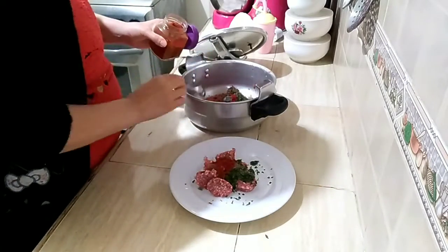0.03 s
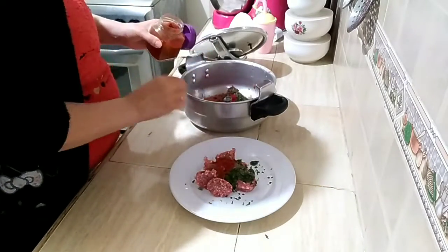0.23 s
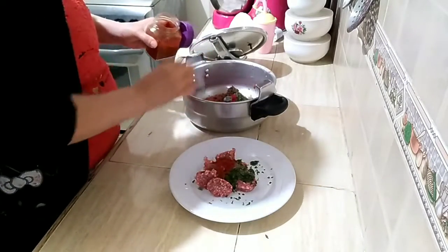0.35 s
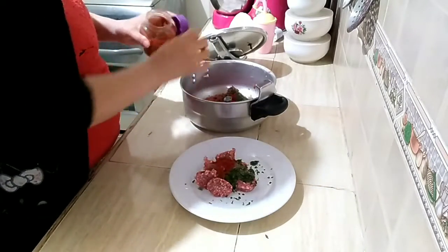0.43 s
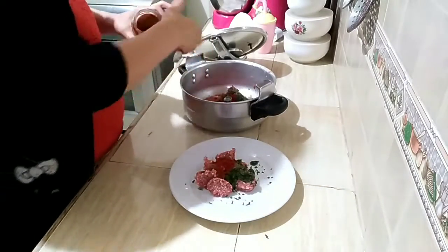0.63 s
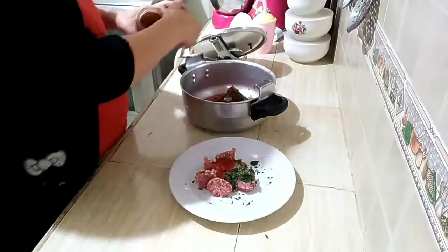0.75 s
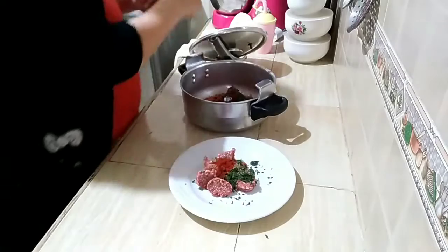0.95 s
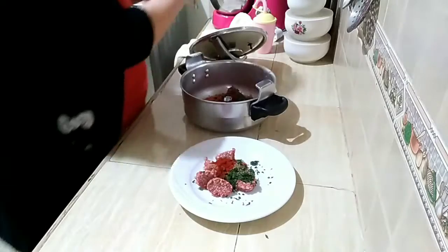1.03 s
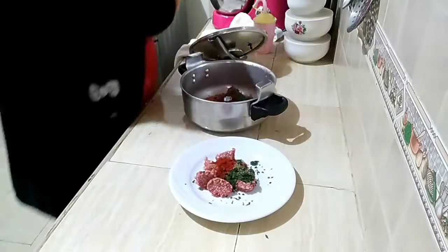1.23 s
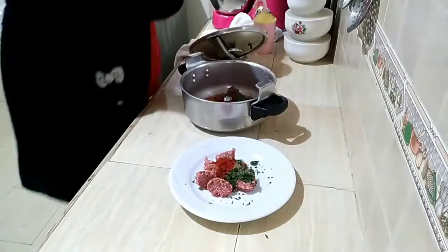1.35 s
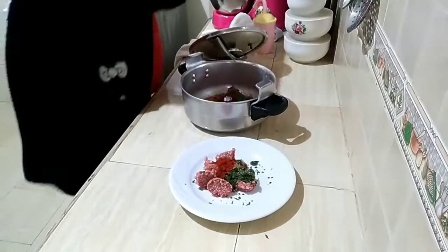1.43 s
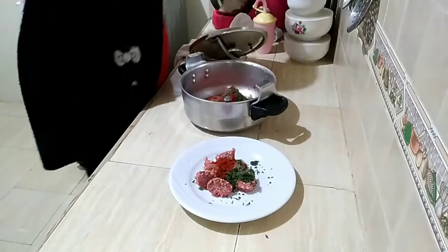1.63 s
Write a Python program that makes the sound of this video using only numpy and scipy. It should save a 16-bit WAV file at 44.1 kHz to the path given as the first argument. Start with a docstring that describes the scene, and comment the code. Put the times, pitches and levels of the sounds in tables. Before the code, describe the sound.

Two bright glass clinks, soft bumps, then a jar scraping and knocking down on a hard counter

```python
"""Tiled kitchen, close to the counter, two microphones: two sharp glass clinks amid soft bumps, then faint ticks.
A jar slides with a falling hollow note and clatters to rest; light glass touches follow, over a quiet low rumble.
Contacts are filtered noise dying away in the room; glass, jar and counter ring as wavering sine modes.
The slide is random friction grains through resonances. A suppressor thins faint sound; loud peaks clip softly."""
import sys
import numpy as np
from scipy import signal
from scipy.fft import irfft
from scipy.io import wavfile
from scipy.ndimage import uniform_filter1d

SR = 44100
rng = np.random.default_rng(int(sys.argv[2]) if len(sys.argv) > 2 else 0)


def store_wav(level_fs):
    """Save 16-bit WAV to argv[1]."""
    pcm = np.round(np.clip(np.atleast_2d(level_fs), -1, 1) * 32767)
    wavfile.write(sys.argv[1], SR, pcm.T.astype(np.int16))


N = 74970  # samples, 1.7 s

# Likeness of diffuse sound at the two microphones: (frequency [Hz], correlation [-1 to 1])
LIKENESS = [(30, .4), (120, .9), (300, .7), (600, .35), (1100, -0.11), (2000, -0.072), (16000, 0.034)]
# Colour of glassy clack and grit: (frequency [Hz], relative level [dB])
CLACK_COLOUR = [(200, -37), (1000, -18), (1850, -9.5), (2600, 0.5), (3400, -5.5), (4500, -5.5),
                (5150, -0.5), (5550, -2), (6700, 0.5), (7300, -4.5), (8400, -6), (9500, -8.5),
                (11500, -14.5), (15500, -22)]


def amp(db):
    """Decibels to gain."""
    return 10 ** (np.asarray(db) / 20)


def evened(x):
    """Scales to rms 1."""
    return x / np.sqrt(np.mean(x ** 2) + 1e-20)


def read(points, hz):
    """Reads a table on a log-frequency axis."""
    f, value = np.transpose(points)
    return np.interp(np.log(hz + 1), np.log(f + 1), value)


def add(mix, s, sound):
    """Mixes a sound in at time s, cut off at the end of the mix."""
    part = mix[:, max(round(s * SR), 0):][:, :sound.shape[-1]]
    part += sound[..., :part.shape[1]]


def coloured(x, points, unit=True, size=4096):
    """Causal minimum-phase filter with the given spectrum, of unit energy unless told otherwise."""
    hz = abs(np.fft.fftfreq(size, 1 / SR))
    log_gain = np.log(amp(read(points, hz)))
    spectrum = np.exp(np.conj(signal.hilbert(log_gain)))
    taps = np.fft.ifft(spectrum).real[:size // 2]
    if unit:
        taps = taps / np.linalg.norm(taps)
    return signal.oaconvolve(x, taps[None], axes=1)[:, :x.shape[1]]


def resonate(x, hz, width_hz):
    """A resonance that follows hz: shift it to zero, low-pass with two equal poles, shift back."""
    turn = np.exp(2j * np.pi * np.cumsum(hz * np.ones(N)) / SR)
    r = np.exp(-np.pi * width_hz / SR)
    lowered = x / turn + 1e-18
    return (turn * signal.lfilter([(1 - r) ** 2], [1, -2 * r, r * r], lowered)).real


def diffuse(size=65536):
    """Sound from all sides: flat spectrum, random phase, most alike at both microphones in the bass."""
    hz = np.fft.rfftfreq(size, 1 / SR)
    a, b = np.exp(2j * np.pi * rng.random((2, len(hz))))
    same = np.clip(read(LIKENESS, hz), -1, 1)
    return evened(irfft([a, same * a + np.sqrt(1 - same ** 2) * b]))


def room(early_db, size=256):
    """One contact as heard: a dense cluster off counter and tiles, then the kitchen's tail."""
    # Decay of the kitchen: (frequency [Hz], t60 [s])
    decay = [(60, 0.68), (200, 0.84), (500, 0.48), (1200, 0.5243), (2700, 0.5281), (6500, 0.4668),
             (10000, 0.4922), (15000, 0.55)]
    early_s = .012  # the cluster's extra level falls away around here
    hz, t, z = signal.stft(diffuse()[:, :SR], SR, nperseg=size)
    dying = z * amp(-60 * t / read(decay, hz)[:, None])
    tail = signal.istft(dying, SR, nperseg=size)[1][:, :SR]
    return tail * (1 + amp(early_db) / (1 + (np.arange(SR) / SR / early_s) ** 6))


def ring(modes, waver, waver_s, size=1000):
    """Dying modes; reflections make each waver differently at the two microphones."""
    t = np.arange(SR) / SR
    out = np.zeros((2, SR))
    for hz, db, t60 in modes:
        # Only the second microphone departs from the first, most where likeness is low
        unlike = (1 - np.clip(read(LIKENESS, hz), 0, 1)) * np.array([[0], [1]])
        knots = rng.standard_normal((2, size)) + 1j * rng.standard_normal((2, size))
        knots = knots[0] + np.sqrt(unlike) * (knots - knots[0])
        phase = np.exp(1j * np.pi * rng.uniform(-0.8, 1) * unlike)
        knots = phase + waver * knots
        drift = np.array([np.interp(t / waver_s, np.arange(size), k) for k in knots])
        out += amp(db - 60 * t / t60) * (drift * np.exp(2j * np.pi * hz * t)).imag
    return out


def rumble():
    """Quiet low rumble of the room: diffuse noise weighted to the bass."""
    # Colour of the rumble: (frequency [Hz], relative level [dB])
    rumble_colour = [(25, -17), (110, 1), (200, -18.5), (450, -12), (800, -27.5), (3000, -23.5),
                     (7000, -33.5), (15000, -49)]
    level_db = -68
    return amp(level_db) * evened(coloured(diffuse(size=2 * N)[:, :N], rumble_colour))


def handling():
    """Faint ticks and light touches as short noise in the room, and soft bumps as a decaying low mode."""
    # Faint ticks: (time [s], level [dB])
    ticks = [(0.8150, -63), (0.8560, -59.5)]
    # Light touches of glass on glass: (time [s], level [dB], ping level [dB])
    touches = [(1.533, -53, -76), (1.5600, -57, -76), (1.5862, -49.5, -49), (1.6820, -63.5, -66.5)]
    # Soft bumps of movement: (time [s], level [dB])
    bumps = [(0.008, -54), (0.040, -46.5), (0.093, -56.5), (0.555, -44), (0.605, -41.5), (0.664, -43.5),
             (0.779, -47), (0.811, -47), (0.858, -48)]
    # Colours of tick and touch: (frequency [Hz], relative level [dB])
    tick_colour = [(200, -15), (800, -25), (3000, -21), (4000, -14), (5600, -23.5), (6000, -6),
                   (6650, -10.5), (7400, -21), (7850, -3.5), (8300, -14.5), (9500, -18.5), (15500, -19.5)]
    touch_colour = [(100, -22), (420, 3), (800, -12), (1350, 1.5), (1900, -9.5), (2600, 0), (3200, -6),
                    (3620, 2), (4100, -2), (5500, 2.5), (6400, 5), (8200, -0.5), (10000, -6), (15500, -11)]
    # Ping of a lightly touched glass: (frequency [Hz], relative level [dB], t60 [s])
    ping_modes = [(3620, -1, .08), (6500, -3, .15)]
    bump_hz, bump_t60_s, bump_rise_s = 114, 0.13, 0.002
    out = np.zeros((2, N))
    for s, db in ticks:
        add(out, s, amp(db) * coloured(room(early_db=8), tick_colour))
    for s, db, ping_db in touches:
        add(out, s, amp(db) * coloured(room(early_db=-10.5), touch_colour))
        add(out, s, amp(ping_db) * ring(ping_modes, waver=0.089, waver_s=0.023))
    rise = 1 - np.exp(-np.arange(SR) / SR / bump_rise_s)
    for s, db in bumps:
        add(out, s, amp(db) * rise * ring([(bump_hz, 0, bump_t60_s)], waver=0.16, waver_s=.015))
    return out


def slide():
    """Friction grains excite a falling hollow note, a glassy grit and a brief squeak."""
    # Course of the slide: (time [s], level [dB], hollow resonance [Hz])
    course = [(0.984, -63.5, 569), (0.994, -42.5, 550), (1.014, -48.5, 528), (1.036, -38, 493),
              (1.052, -31.5, 459), (1.073, -37, 395), (1.088, -40.5, 290), (1.135, -46.5, 260)]
    # Squeak: (centre time [s], bell-curve spread [s], pitch [Hz], width [Hz], level [dB])
    at, spread, pitch_hz, squeak_width_hz, squeak_db = (1.060, .007, 5230, 200, -31)
    hollow_width_hz, grit_db, grains_per_s, room_db = 113, 1, 1200, -5
    t = np.arange(N) / SR
    s, db, hz = np.transpose(course)
    level = amp(np.interp(t, s, db, left=-150, right=-150))
    grains = rng.standard_normal((2, N)) * (rng.random((2, N)) < grains_per_s / SR)
    shared_grains = grains + .5 * grains[::-1]  # each microphone also gets some of the other's
    hollow = evened(resonate(shared_grains, np.interp(t, s, hz), hollow_width_hz))
    grit = amp(grit_db) * evened(coloured(grains, CLACK_COLOUR))
    scrape = level * (hollow + grit)
    squeak = amp(squeak_db) * evened(resonate(grains, pitch_hz, squeak_width_hz))
    squeak = squeak * np.exp(-.5 * ((t - at) / spread) ** 2)
    walls = room(early_db=-19)
    walls = walls / np.linalg.norm(walls[0])
    return scrape + squeak + amp(room_db) * signal.fftconvolve(scrape, walls, axes=1)[:, :N]


def knocks():
    """The jar rocks on its base and bumps its neighbours; the counter thumps beneath."""
    # Jar knocks: (time [s], glassy clack level [dB], hollow knock level [dB], counter thump level [dB])
    hits = [(0.9876, -40, -42, -76.5), (1.019, -39.5, -41.5, -49.5), (1.0471, -36, -36.5, -65.5),
            (1.0870, -40, -36.5, -26.5), (1.1080, -66, -40.5, -28.5), (1.1380, -31, -37, -20.5),
            (1.1447, -25.5, -34, -26.5), (1.1533, -19.5, -28, -35.5), (1.2067, -26.5, -30, -27.5),
            (1.2370, -35.5, -46.5, -27.5), (1.3961, -47.5, -53.5, -44)]
    # Colours of knock and thump: (frequency [Hz], relative level [dB])
    knock_colour = [(40, -37.5), (200, -26), (400, -5), (540, -5.5), (680, -2), (880, -8), (1090, -1.5),
                    (1190, -2), (1320, 0.5), (1750, -14.5), (3500, -15), (9000, -48)]
    thump_colour = [(30, -24), (60, -24), (90, -2.5), (150, -21.5), (230, 2.5), (300, -6), (385, -5.5),
                    (500, -13.5), (1000, -32), (4000, -61.5)]
    # Modes of the knocked jar and of the counter: (frequency [Hz], relative level [dB], t60 [s])
    jar_modes = [(1297, -9, .55), (2560, -8, .25), (2879, -5, .3), (3560, -6, .35), (5146, 0, .35),
                 (5922, -5, .3), (6122, -5, .35), (6625, -4, .3), (7974, -6, .3)]
    counter_modes = [(81.5, -41.5, 1), (122.2, -25.5, 1), (206.7, -8, 0.45), (227, 1.5, 0.097),
                     (382, -4, 0.064)]
    jar_db, boom_db, thump_rise_s = -9, -15.5, .002
    out = np.zeros((2, N))
    rise = 1 - np.exp(-np.arange(SR) / SR / thump_rise_s)
    for s, clack_db, knock_db, thump_db in hits:
        clack = coloured(room(early_db=0.5), CLACK_COLOUR)
        jar = amp(jar_db) * ring(jar_modes, waver=.5, waver_s=0.041)
        add(out, s, amp(clack_db) * (clack + jar))
        add(out, s, amp(knock_db) * coloured(room(early_db=-3), knock_colour))
        boom = amp(boom_db) * coloured(room(early_db=-2), thump_colour)
        counter = rise * ring(counter_modes, waver=0.11, waver_s=0.017)
        add(out, s, amp(thump_db) * (counter + boom))
    return out


def clinks():
    """Two hard taps: a bright crack of noise, hollow body modes and the ringing of the glass."""
    # Sharp clinks: (time [s], level [dB], ringing level [dB])
    taps = [(0.2145, -10, -16), (0.3626, -10, -17)]
    # Colour of the crack: (frequency [Hz], relative level [dB])
    crack_colour = [(30, -27.5), (150, -19), (330, -17.5), (540, -11.5), (700, -19), (1000, -12.5),
                    (1800, -19), (2700, -9.5), (3250, -14.5), (3850, -16), (4180, -8.5), (4700, -11),
                    (5050, 0.5), (5750, -12.5), (6300, -1), (6820, 2), (7250, -6.5), (8200, -5.5),
                    (9300, -15), (10600, -11), (11300, -21), (14500, -21.5), (16000, -31)]
    # Modes of the struck glass and its low body: (frequency [Hz], relative level [dB], t60 [s])
    glass_modes = [(2659, -15, .5), (2937, -14, .3), (4213, -13, .4), (4977, -8, .3), (5036, -8, .4),
                   (5137, -10, .45), (5479, -12, .38), (6280, 0, .42), (6310, -4, .45), (6532, -5, .38),
                   (6657, -7, .35), (6721, -5, .38), (6826, 2, .46), (7665, -8, .4), (8511, -11, .42)]
    body_modes = [(548, -12, .16), (907, -15, .42)]
    out = np.zeros((2, N))
    for s, db, ring_db in taps:
        add(out, s, amp(db) * coloured(room(early_db=-5), crack_colour))
        add(out, s, amp(ring_db) * ring(glass_modes, waver=0.57, waver_s=.025))
        add(out, s, amp(db) * ring(body_modes, waver=.3, waver_s=.015))
    return out


def suppress(x, size=512):
    """Noise suppressor: turns down whatever is faint, band by band."""
    below_db, depth_db = -76, 8  # power in a band where half the depth applies; greatest cut
    z = signal.stft(x, SR, nperseg=size)[2]
    power = uniform_filter1d(abs(z) ** 2, size=5, axis=1)  # smooth across bands
    power = uniform_filter1d(power, size=3, axis=2)  # then across time
    faint = 1 / (1 + abs(power) / amp(below_db) ** 2)
    return signal.istft(z * amp(-depth_db * faint), SR, nperseg=size)[1][:, :N]


def scene():
    """All the sounds at the counter, from the background to the clinks."""
    return rumble() + handling() + slide() + knocks() + clinks()


def record(dry):
    """Each microphone has its own colour; faint sound is suppressed, peaks softly clipped, treble cut."""
    # Balance of the microphones: (frequency [Hz], left minus right [dB])
    balance = [(100, -2), (1200, 1), (2700, -0.5), (4500, -1), (5200, -1.5), (6600, -4.5), (7150, -3),
               (7900, 12.5), (9300, 7.5), (10700, -1), (11800, 6), (14500, -1)]
    ceiling, knee = .92, .55  # of full scale: limit of the soft clip, level where it begins
    edge_hz = 15800
    left = coloured(dry[[0]], [(hz, db / 2) for hz, db in balance], unit=False)
    right = coloured(dry[[1]], [(hz, -db / 2) for hz, db in balance], unit=False)
    x = suppress(np.vstack([left, right]))
    span = ceiling - knee
    excess = np.maximum(abs(x) - knee, 0)
    x = np.clip(x, -knee, knee) + np.sign(x) * span * np.tanh(excess / span)
    low_pass = signal.firwin(511, edge_hz, window=("kaiser", 9), fs=SR)
    return signal.oaconvolve(x, low_pass[None], "same")


dry = scene()
out = record(dry)
store_wav(out)
```